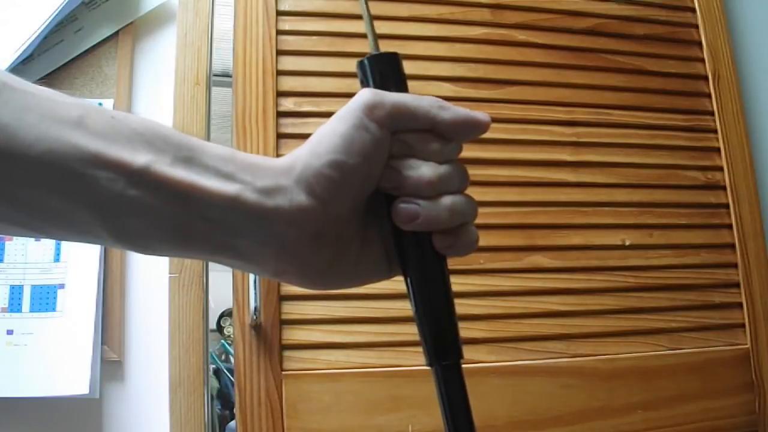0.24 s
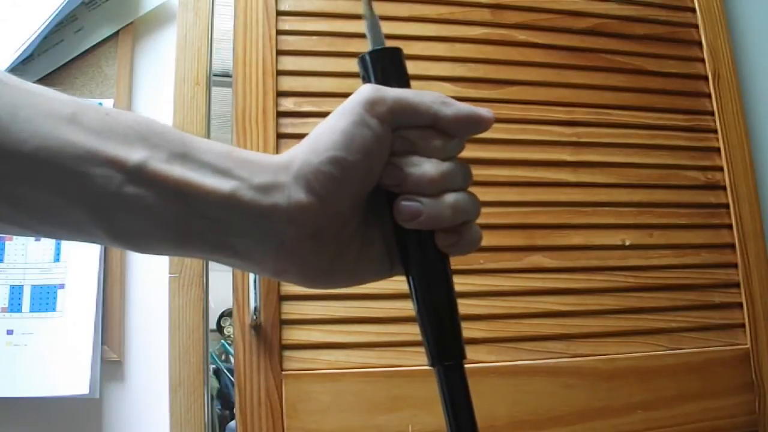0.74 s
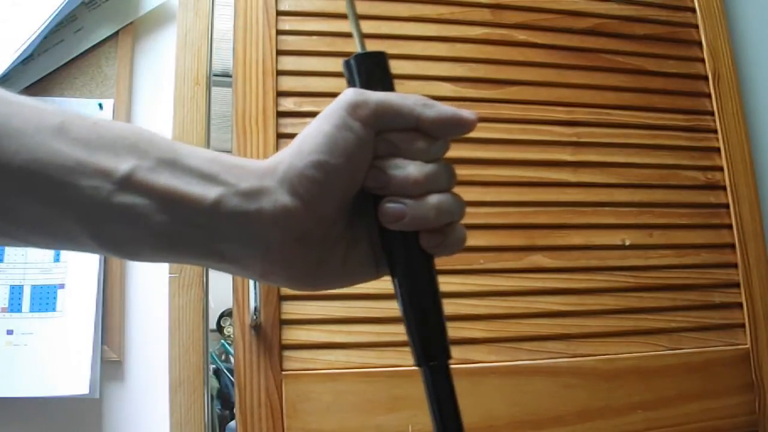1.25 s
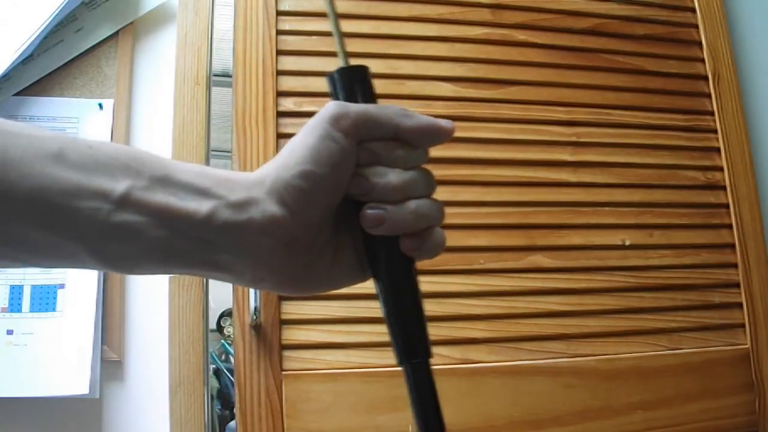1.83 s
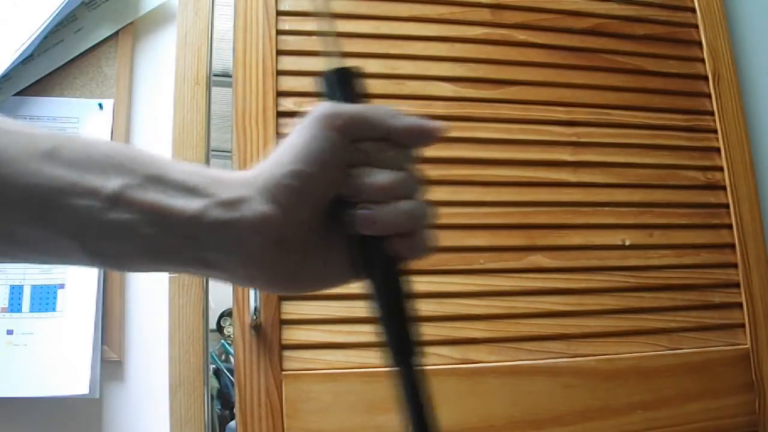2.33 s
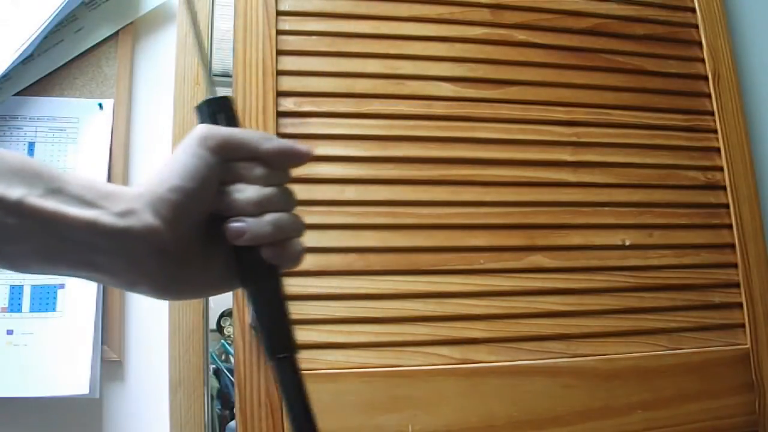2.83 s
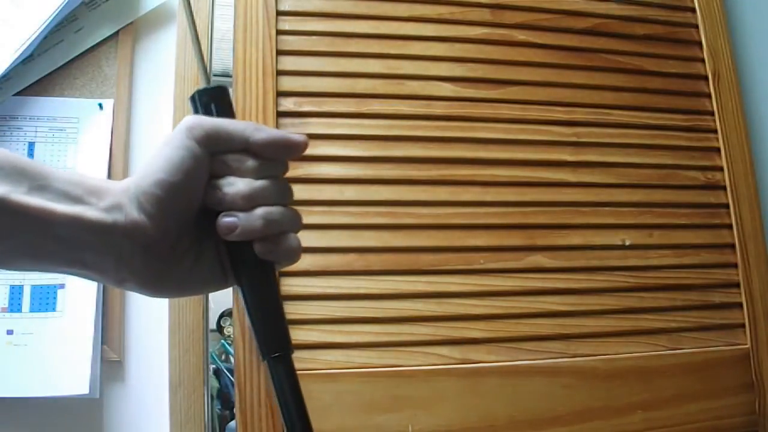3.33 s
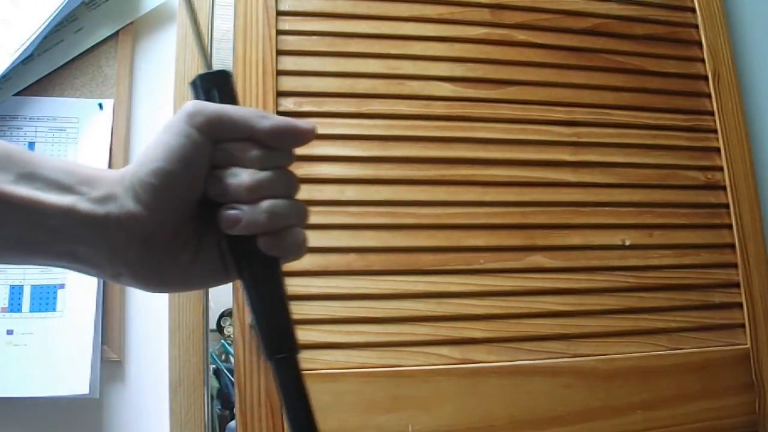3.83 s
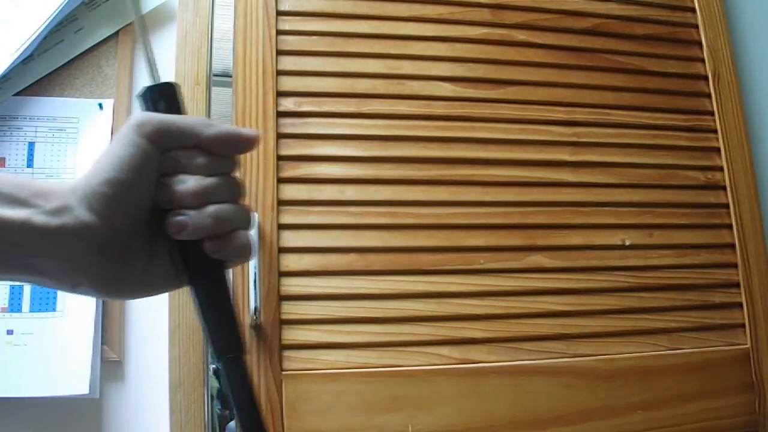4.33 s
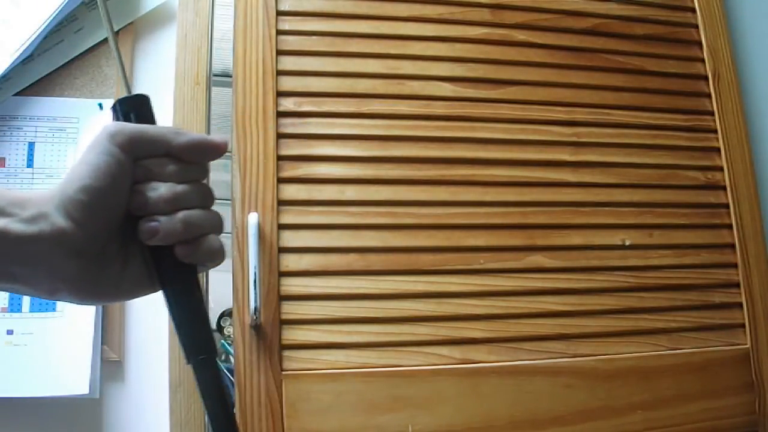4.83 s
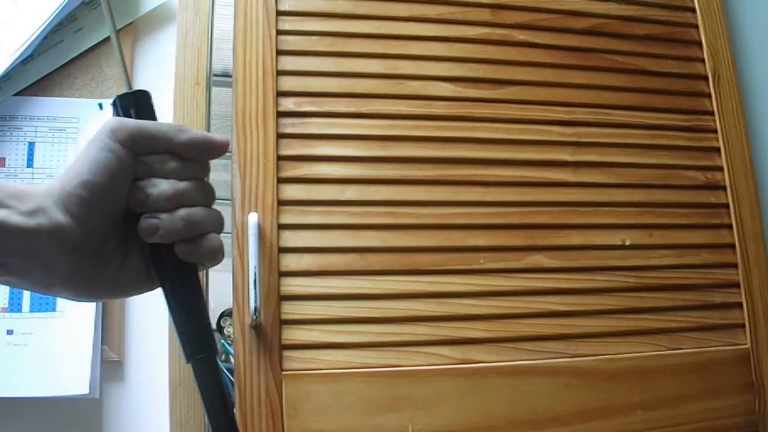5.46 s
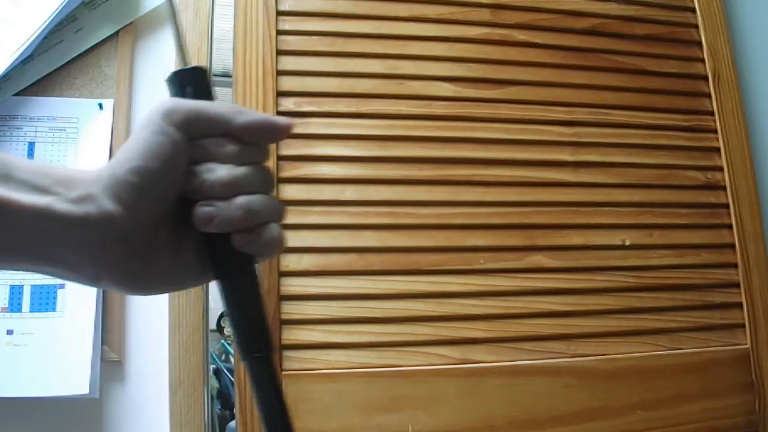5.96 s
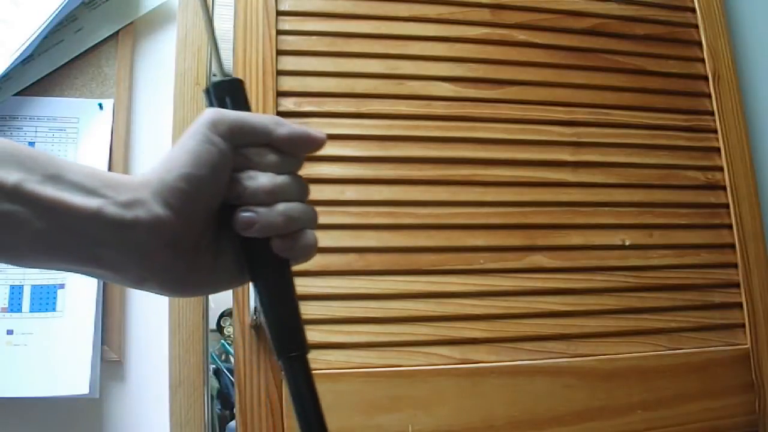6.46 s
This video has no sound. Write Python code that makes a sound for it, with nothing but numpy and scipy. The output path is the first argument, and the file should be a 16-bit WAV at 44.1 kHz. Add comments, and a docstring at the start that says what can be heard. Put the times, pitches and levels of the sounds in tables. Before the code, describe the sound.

A metal rod with a cloth patch scrapes and hisses in bursts through a steel gun barrel, with sharp clicks and dull end-stop knocks.

```python
"""In a small room, a cleaning rod with a cloth patch is worked up and down a steel gun barrel.
Friction noise makes the patch hiss and the rod scrape; the bore's air column rings in narrow, ragged bands.
Impacts excite the damped modes of the steel; end stops jolt the gun, and the drawn-out rod rings on.
Shaped noise and steady or wavering sines form a low room hum and a thin electronic whine."""
import sys
import numpy as np
from scipy import signal
from scipy.fft import rfft, irfft
from scipy.io import wavfile
from scipy.ndimage import uniform_filter1d

SR = 44100
rng = np.random.default_rng(int(sys.argv[2]) if len(sys.argv) > 2 else 0)


def transcribe(u):
    """Save the signal u as a 16-bit wav file named by the first command-line argument.

    u: samples, shape (n,) or (channels, n), limited to [-1, 1]; the rate is SR.
    q: integer samples, one column per channel.
    """
    v = np.clip(np.atleast_2d(u).T, -1, 1)
    q = np.round(v * 32767).astype(np.int16)
    wavfile.write(sys.argv[1], SR, q)


N = 295029  # samples
BINS = np.fft.rfftfreq(4096, 1 / SR)  # frequencies of every filter gain, Hz
LEVEL_S = 0.004  # the level of a blow or jolt counts its whole energy as lying within this time


def amp(db):
    """Level definition: 20 dB is a tenfold amplitude."""
    return 10 ** (np.asarray(db) / 20)


def evened(x):
    """Normalisation to unit root-mean-square amplitude."""
    return x / np.sqrt(np.mean(x ** 2) + 1e-20)


def read(points, hz):
    """Linear interpolation of a table along a logarithmic frequency axis."""
    f, value = np.transpose(points)
    return np.interp(np.log(hz + 1), np.log(f + 1), value)


def add(mix, s, sound):
    """Superposition: adds a sound into the mix from time s, in seconds."""
    part = mix[round(s * SR):][:len(sound)]
    part += sound[:len(part)]


def coloured(x, gain):
    """Minimum-phase filtering by a gain on BINS: causal, so ringing only follows an impulse."""
    both_sides = np.r_[gain, gain[-2:0:-1]]
    log_gain = np.log(np.maximum(both_sides, 1e-5))
    # the Hilbert transform of the log gain gives the minimum phase
    taps = np.fft.ifft(np.exp(np.conj(signal.hilbert(log_gain)))).real
    return signal.oaconvolve(x, taps)[:len(x)]


def peak(hz, width):
    """Resonance: the gain of one damped mode, 1 at its centre."""
    return 1 / np.sqrt(1 + (2 * (BINS - hz) / width) ** 2)


def band(lo_hz, hi_hz):
    """Band-pass gain with steep, maximally flat skirts."""
    low_side = 1 + (lo_hz / (BINS + 1)) ** 10
    high_side = 1 + (BINS / hi_hz) ** 10
    return 1 / np.sqrt(low_side * high_side)


def drift(rate):
    """Low-pass random fluctuation of rms 1, its spectrum halved in amplitude at rate, in Hz."""
    f = np.fft.rfftfreq(N, 1 / SR)
    spectrum = rfft(rng.standard_normal(N)) / (1 + (f / rate) ** 4)
    return evened(irfft(spectrum, N))


def steel(between_db=-21):
    """Modal response: the gains of all the modes add over a flat bed of weaker ones."""
    # modes of rod and barrel, damped by the hand: f/Hz, width at half gain/Hz, level/dB
    modes = [(793, 57, -17.5), (1102, 530, -7.5), (1619, 145, 2), (2303, 375, -1), (2748, 237, 1),
             (3250, 450, -4.5), (4074, 484, 0), (4320, 390, -11.5), (5313, 210, -7), (5750, 320, -3.5),
             (7555, 490, -8.5), (8350, 480, -32.5), (9500, 215, -20.5)]
    return amp(between_db) + sum(amp(db) * peak(hz, width) ** 2 for hz, width, db in modes)


def background(hum_waver=0.498, hum_rate=2.465, hum_swell_db=2.2):
    """Broadband and tonal noise: rumble and hiss, a hum wavering in level and phase, steady tones."""
    # relative spectral density of room rumble and hiss: f/Hz, level/dB
    air_shape = [(8, -4), (19, 3), (27, 0.5), (36, -8.5), (51, -2), (62, -18.5), (100, -21), (160, -25),
                 (230, -28), (620, -35), (1100, -39.5), (3000, -45.5), (9500, -49), (11350, -40),
                 (12000, -49), (13500, -54.5), (16000, -53)]
    # wavering tones of the hum: f/Hz, rms level/dB before the swell
    hum_tones = [(77, -60.5), (104.5, -55.5), (129, -63), (145.3, -58), (210, -68)]
    # steady electronic tones: f/Hz, rms level/dB
    faint_tones = [(10006.5, -82.5), (10083.7, -71), (10160.7, -71), (10238.6, -81.5), (15278, -80.5)]
    t, f = np.arange(N) / SR, np.fft.rfftfreq(N, 1 / SR)
    noise_spectrum = rfft(rng.standard_normal(N)) * amp(read(air_shape, f))
    air = amp(-39.5) * evened(irfft(noise_spectrum, N))
    hum = np.zeros(N)
    for hz, db in hum_tones:
        level = amp(db + hum_swell_db * drift(hum_rate))
        phase_waver = hum_waver * drift(hum_rate)  # rad
        hum += level * np.sin(2 * np.pi * hz * t + phase_waver)
    tones = sum(amp(db) * np.sin(2 * np.pi * (hz * t + rng.random())) for hz, db in faint_tones)
    return air + np.sqrt(2) * (hum + tones)  # a sine of rms 1 peaks at the square root of 2


def whine(db=-58.5, swing=1.1, hz=11376.5, cycle_hz=15):
    """Phase modulation: the strongest electronic tone swings in pitch at a constant level."""
    t = np.arange(N) / SR
    cycle = sum(np.sin(2 * np.pi * k * cycle_hz * t) / k ** 2 for k in (1, 3, 5))
    return amp(db) * evened(np.sin(2 * np.pi * hz * t + swing * cycle))


def friction(slips_per_s, spread_db, smooth):
    """Friction as shot noise: random tiny slips of uneven size over a smooth rub."""
    sizes = amp(spread_db * np.minimum(rng.exponential(1, N), 4))
    happens = rng.random(N) < slips_per_s / SR
    slips = sizes * rng.choice([-1, 1], N) * happens
    return evened(slips) + smooth * rng.standard_normal(N)


def wander(x, patches_db=5.0):
    """Sliding contact: as the contact point moves, narrow bands swell and fade by chance."""
    z = signal.stft(x, SR, nperseg=1024, noverlap=768)[2]
    over_time = uniform_filter1d(rng.standard_normal(z.shape), size=9, axis=1)
    patches = evened(uniform_filter1d(over_time, size=4, axis=0))
    varied = signal.istft(z * amp(patches_db * patches), SR, nperseg=1024, noverlap=768)[1]
    return evened(varied[:N])


def rubbing_levels():
    """Velocity law: friction gains of rod and cloth grow as powers of speed; catches add rasps."""
    # each push or pull: start t/s, speeding up t/s, slowing down t/s,
    # rod scraping on steel level/dB, cloth hiss level/dB (both at full speed)
    pushes = [(0.0, 0.0033, 0.091, -43, -49), (0.06, 0.098, 0.058, -51, -54.5),
              (0.25, .04, 0.28, -78, -56.5), (0.6, .27, .04, -64, -61), (0.915, .03, .04, -41, -50),
              (0.93, 0.2, 0.42, -46.5, -46), (1.31, 0.27, .14, -50, -44.5), (1.46, 0.13, 0.049, -43.5, -37),
              (1.61, 0.052, .14, -43, -37), (2.1, 0.42, .3, -67, -63), (2.92, 0.14, 0.091, -45, -44.5),
              (3.2, 0.083, 0.2, -67, -55.5), (3.3, 0.12, 0.14, -49, -50.5),
              (3.87, 0.12, 0.22, -47.5, -43.5), (4.14, 0.021, 0.059, -32.5, -52),
              (4.232, 0.064, 0.086, -42, -45.5), (4.389, 0.074, 0.072, -39.5, -42),
              (4.92, 0.04, 0.02, -68, -57.5), (5.57, 0.068, 0.057, -49, -53.5),
              (5.678, 0.026, 0.064, -38.5, -39.5), (5.73, 0.3, 0.15, -54, -42.5),
              (6.02, 0.091, .2, -43, -46.5), (6.19, 0.038, 0.2, -47, -50), (6.3, 0.17, 0.36, -55, -58.5)]
    # the rod catches on the bore and rasps briefly: t/s, level/dB
    catches = [(0.158, -64), (1.0, -38.5), (3.908, -49), (5.692, -41.5), (5.775, -42), (5.832, -43.5),
               (5.925, -43.5), (6.12, -39), (6.46, -50)]
    rod_power, cloth_power = 1.48, 1.9  # exponents of amplitude against speed
    attack_s, hold_s, release_s = 0.0071, 0.02, 0.057  # of a catch
    t = np.arange(N) / SR
    rod_energy, cloth_energy = np.zeros(N), np.zeros(N)
    for start, rise_s, fall_s, rod_db, cloth_db in pushes:
        age = np.arange(0, rise_s + fall_s, 1 / SR)
        ramp = np.interp(age, [0, rise_s, rise_s + fall_s], [0, 1, 0])
        speed = np.sin(np.pi / 2 * ramp)  # relative to the fastest moment of the stroke
        add(rod_energy, start, (amp(rod_db) * speed ** rod_power) ** 2)
        add(cloth_energy, start, (amp(cloth_db) * speed ** cloth_power) ** 2)
    rasp = np.interp(t, np.cumsum([0, attack_s, hold_s, release_s]), [0, 1, 1, 0])
    for start, db in catches:
        add(rod_energy, start, (amp(db) * rasp) ** 2)
    return np.sqrt(rod_energy), np.sqrt(cloth_energy)


def strokes(through_steel=0.47, unsteady_db=1.5):
    """Friction excitation: rod slips ring the steel, finer cloth grain rings it less; the hand wavers."""
    # colour of the rod's scrape: f/Hz, level/dB
    rod_colour = [(100, -9.5), (500, -1), (1000, -2), (2000, 4.5), (4500, 1), (6500, -2), (9000, -9.5),
                  (16000, -14.5)]
    # colour of the cloth's hiss: f/Hz, level/dB
    cloth_colour = [(200, -21.5), (1500, -7), (4100, 1), (5500, 4.5), (6700, 0.5), (7800, 2), (9200, -0.5),
                    (10300, -2), (12400, -12.5), (15900, -21)]
    rod_gain, cloth_gain = rubbing_levels()
    rod_slips = friction(slips_per_s=2000, spread_db=3, smooth=0.8)
    cloth_slips = friction(slips_per_s=4000, spread_db=2.8, smooth=1)
    scrape = wander(coloured(rod_slips, steel() * amp(read(rod_colour, BINS))))
    # a power below 1 flattens the steel's resonances
    cloth_filter = steel() ** through_steel * amp(read(cloth_colour, BINS))
    hiss = wander(coloured(cloth_slips, cloth_filter))
    hand = amp(unsteady_db * drift(48.4))
    return hand * (scrape * rod_gain + hiss * cloth_gain)


def knocks(emphasis_hz=700, buzz=0.13, buzz_s=0.0091, bump_s=0.0066):
    """Impact excitation: a brief chatter of contacts rings modes weighted by where the blow lands."""
    # rod against barrel: t/s, strongest ring f/Hz, its boost level/dB, contact decay t/s (before the
    # spectrum is evened), ring level/dB, hollow clack and bright tick level/dB relative to the ring
    blows = [(0.1109, 3950, 7, .0022, -45, -5, -5), (0.199, 4050, 12, 0.0017, -31, -19, -18),
             (0.2057, 4000, 3, 0.00056, -21, -32.5, -11), (0.226, 4080, 10, .0007, -38, -14, -3),
             (0.9019, 2847, -1, 0.00056, -34.5, -10, -6.5), (0.9211, 3160, 15, 0.0058, -26.5, -9, -9),
             (0.9517, 3940, -4, 0.0093, -23, -5.5, -11.5), (0.9852, 2960, -7, 0.00076, -13.5, -15, -5.5),
             (1.5859, 4030, 3, 0.0011, -13.5, -11.5, -10), (1.7197, 3430, 11, 0.0013, -14, -17.5, -6),
             (1.8797, 3210, 20, .0018, -51.5, -27, -22), (3.11, 5860, 4, 0.003, -13, -11, -6),
             (3.3543, 3000, 7, .003, -48.5, 0, -15), (3.7133, 2910, 12, .0015, -54.5, -13, -18),
             (3.8142, 3120, 26, .0018, -42, -30, -26), (3.847, 2340, 10, 0.0012, -36.5, -5, -10.5),
             (3.8575, 3120, 22, 0.0011, -39, -9.5, -25), (4.1398, 3450, 7, .0007, -15, -15.5, -7.5),
             (4.4583, 3100, 0, 0.0064, -17.5, -23, 0), (5.4276, 2230, 7, 0.0037, -41, -7.5, -28),
             (5.5075, 2760, 4, 0.00073, -39, -10, -7.5), (5.569, 1630, 9, 0.0015, -40, -4.5, -15),
             (6.5384, 2150, 14, 0.0055, -25.5, -14, -8)]
    # colour of the bright tick: f/Hz, level/dB
    tick_shape = [(5600, 4), (7900, 6.5), (10400, -2.5), (15900, -17)]
    thud_db = -31.5  # relative to the ring
    out, t = np.zeros(N), np.arange(len(BINS) * 2) / SR
    body = steel(between_db=-10.5)
    low, hollow = band(160, 620), band(760, 1550)
    middle, high = band(1400, 5500), band(5400, 16000)
    for s, hz, boost_db, contact_s, db, clack_db, tick_db in blows:
        chatter = rng.choice([-1, 1], len(t))
        fading = np.exp(-t / contact_s) + buzz * np.exp(-t / buzz_s)
        spectrum = rfft(chatter * fading)
        # a hard contact feeds all frequencies nearly alike
        blow = irfft(spectrum / np.sqrt(abs(spectrum) + 1e-9))
        blow = blow * (t < t[-1] / 2)  # drops what the transform wraps round to the end
        struck = body * (1 + amp(boost_db) * peak(hz, emphasis_hz))
        ring = coloured(blow, struck * middle)
        thud = coloured(chatter * np.exp(-t / bump_s), low * peak(250, 400))
        clack = coloured(blow, np.sqrt(body) * hollow)
        tick = coloured(blow, struck * high * amp(read(tick_shape, BINS)))
        sound = evened(ring) + amp(thud_db) * evened(thud)
        sound += amp(clack_db) * evened(clack) + amp(tick_db) * evened(tick)
        add(out, s, amp(db) * sound * np.sqrt(LEVEL_S / t[-1]))
    return out


def rod_rings(split_hz=55):
    """Mode splitting: the rod bends in two planes, so each mode is a close pair that beats as it dies."""
    # with much of its length drawn out, the struck rod rings on: t/s, level/dB
    free_rings = [(0.2053, -24), (0.9856, -23.5), (6.5368, -39)]
    # the rod's own modes when free of the bore: f/Hz, level/dB relative to the ring, 60 dB decay t/s
    rod_modes = [(800, -25, .2), (1068, -23, .16), (1310, -25, 0.29), (1637, -11, 0.22), (2850, 0, .13),
                 (4050, 6, 0.07), (5873, -6, .1)]
    out, t = np.zeros(N), np.arange(SR // 3) / SR
    for s, level_db in free_rings:
        for hz, db, t60 in rod_modes:
            pair = np.zeros(len(t))
            for plane in range(2):
                plane_hz = hz + split_hz * rng.uniform(-1.1, 1)
                pair += np.sin(2 * np.pi * plane_hz * t)
            add(out, s, amp(level_db + db - 60 * t / t60) * pair / 2)
    return out


def bore_resonances(ragged_hz=170):
    """Bore resonance: the air column rings in a narrow, ragged band that glides as the patch travels."""
    # narrow resonances heard in the rubbing, gliding or nearly steady:
    # start t/s, end t/s, rms level/dB, first f/Hz, last f/Hz
    glides = [(0.93, 0.951, -36.5, 3140, 3520), (1.082, 1.269, -45, 4140, 3930),
              (1.252, 1.377, -49.5, 3940, 2680), (1.388, 1.585, -55, 7320, 7650),
              (1.46, 1.6, -47, 4070, 4100), (3.001, 3.087, -57, 2870, 2910), (3.362, 3.43, -57, 1736, 1710),
              (3.445, 3.515, -59, 3270, 3120), (3.906, 3.929, -40.5, 2246, 2390),
              (4.29, 4.344, -35.5, 2720, 2055), (5.558, 5.592, -48, 1587, 1620),
              (5.917, 6.16, -48, 4260, 4210)]
    out = np.zeros(N)
    low_pass = signal.butter(2, ragged_hz, fs=SR, output="sos")
    for start, end, db, first_hz, last_hz in glides:
        count = max(round((end - start) * SR), 64)
        turns = np.cumsum(np.linspace(first_hz, last_hz, count)) / SR
        grain = signal.sosfilt(low_pass, rng.standard_normal((2, SR // 2)))[:, :count]
        # slow complex noise on a gliding carrier is a moving band of noise
        tone = ((grain[0] + 1j * grain[1]) * np.exp(2j * np.pi * turns)).real
        swell = np.sin(np.linspace(0, np.pi, count))
        add(out, start, amp(db) * evened(tone * swell))
    return out


def jolts(decay_s=0.013):
    """Heavily damped impact: a dull, quickly fading bump of the gun's body at each end stop."""
    # the rod reaches the end of its travel and jolts the whole gun: t/s, level/dB
    end_stops = [(1.7201, -26.5), (4.4574, -20.5)]
    # colour of the bump: f/Hz, level/dB
    jolt_shape = [(60, -7), (120, -6), (180, -3), (280, 1.5), (420, -5.5), (560, -9.5), (780, -12),
                  (1200, -11.5), (2500, -45)]
    out, t = np.zeros(N), np.arange(len(BINS) * 2) / SR
    for s, db in end_stops:
        chatter = rng.choice([-1, 1], len(t)) * np.exp(-t / decay_s)
        bump = coloured(chatter, amp(read(jolt_shape, BINS)))
        add(out, s, amp(db) * evened(bump) * np.sqrt(LEVEL_S / t[-1]))
    return out


def room(x, wet_db, first_s=0.0031, echoes_per_s=4000):
    """Reverberation: dense echoes from near furniture and walls decay at a rate set by frequency."""
    # the room's decay: f/Hz, 60 dB decay t/s
    room_decay = [(150, .2), (700, .2), (1600, .27), (4000, .24), (8000, .21), (16000, .15)]
    count = SR // 2
    echoes = rng.choice([-1., 1.], count) * (rng.random(count) < echoes_per_s / SR)
    echoes = echoes * (np.arange(count) > first_s * SR)
    hz, t, z = signal.stft(echoes, SR, nperseg=256)
    decay = amp(-60 * t / read(room_decay, hz)[:, None])
    tail = signal.istft(z * decay, SR, nperseg=256)[1]
    return x + amp(wet_db) * signal.fftconvolve(x, tail / np.linalg.norm(tail))[:N]


def scene():
    """Superposition of rubbing and impacts, each with its reverberation, over the background."""
    rubs = strokes() + bore_resonances()
    hits = knocks() + jolts() + rod_rings()
    in_room = room(rubs, wet_db=-15.5) + room(hits, wet_db=-11.5)
    return (in_room + background() + whine())[None]


def record(dry):
    """Band limitation: a linear-phase low-pass filter removes the extreme treble."""
    edge_hz = 16100
    taps = signal.firwin(511, edge_hz, window=("kaiser", 9), fs=SR)
    return signal.oaconvolve(dry, taps[None], "same")


dry = scene()
out = record(dry)
transcribe(out)
```